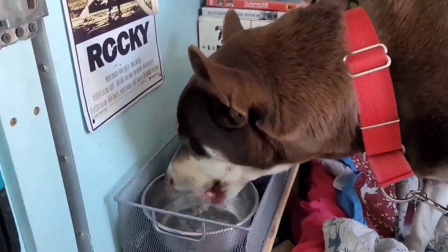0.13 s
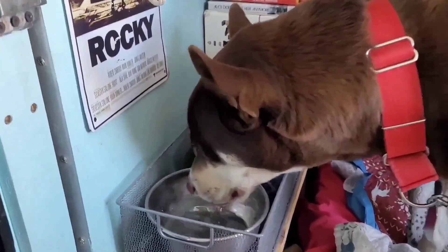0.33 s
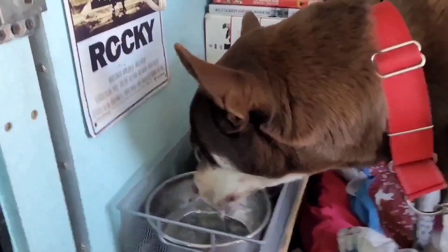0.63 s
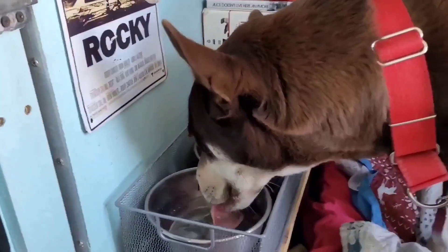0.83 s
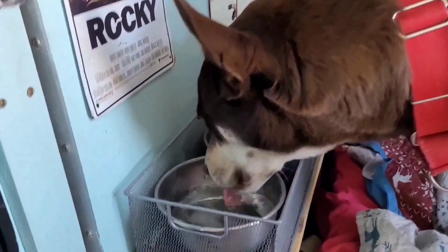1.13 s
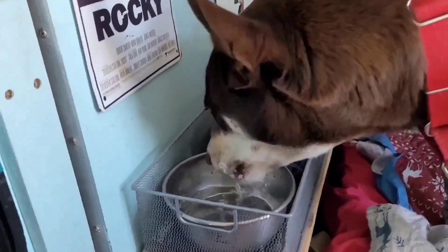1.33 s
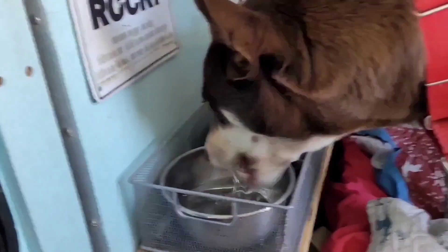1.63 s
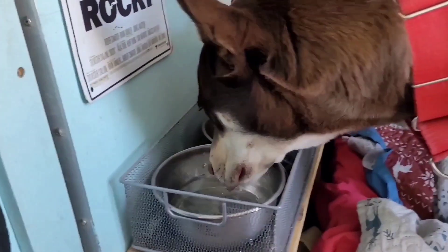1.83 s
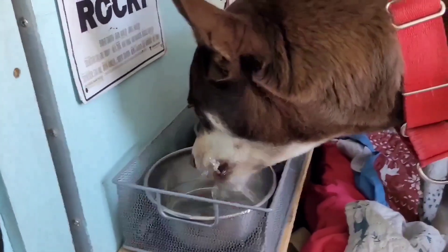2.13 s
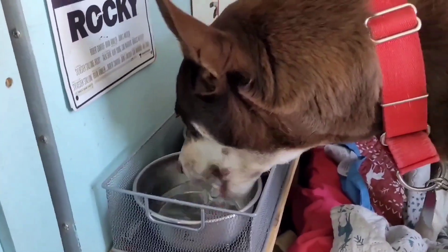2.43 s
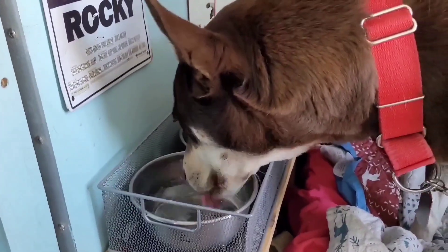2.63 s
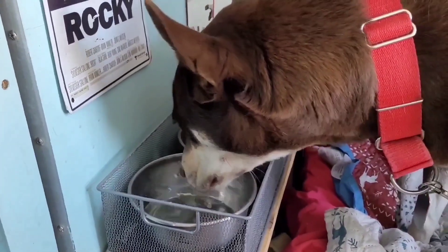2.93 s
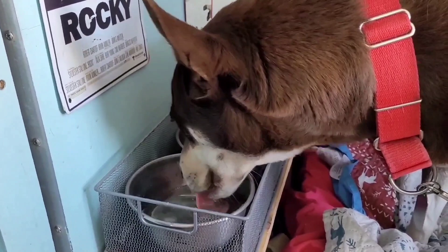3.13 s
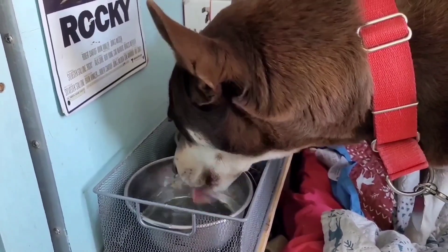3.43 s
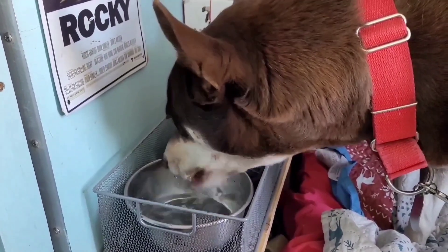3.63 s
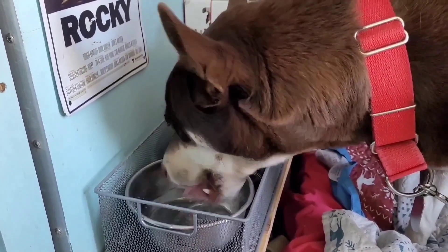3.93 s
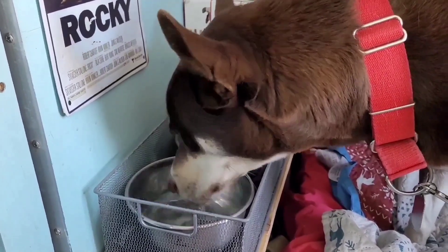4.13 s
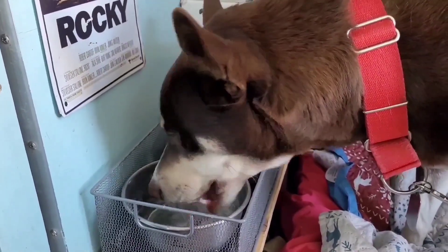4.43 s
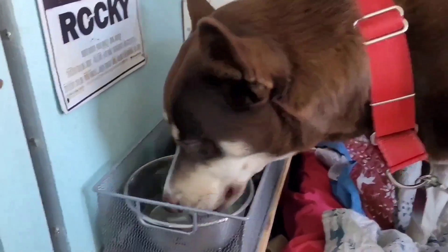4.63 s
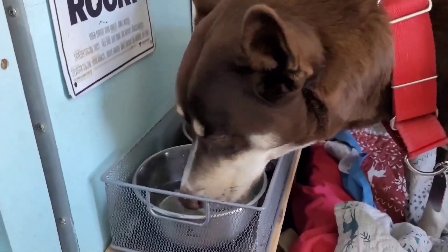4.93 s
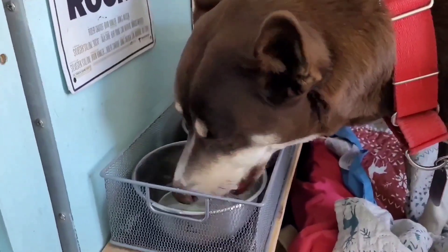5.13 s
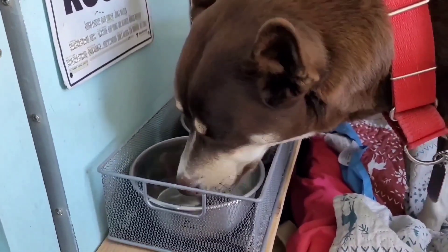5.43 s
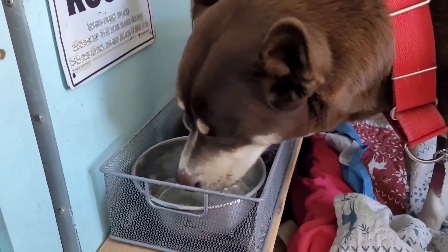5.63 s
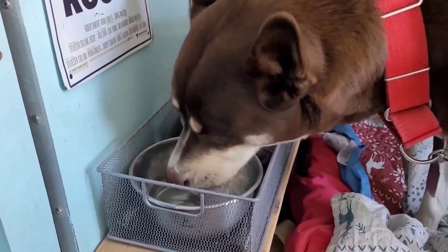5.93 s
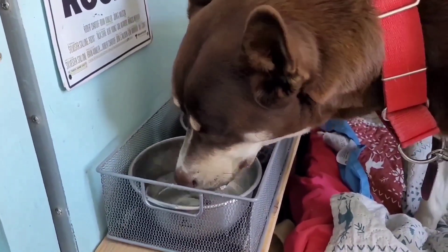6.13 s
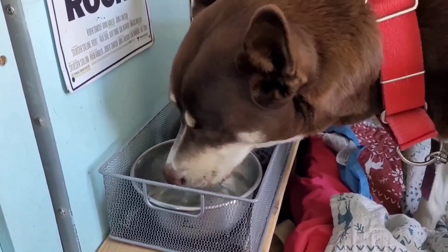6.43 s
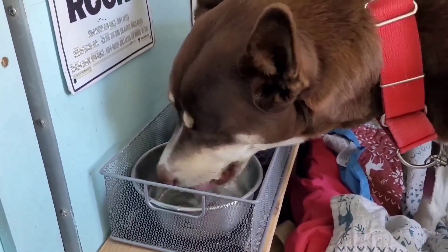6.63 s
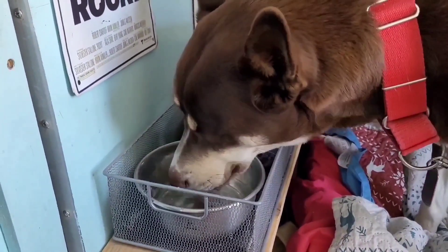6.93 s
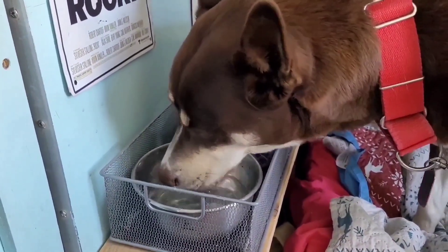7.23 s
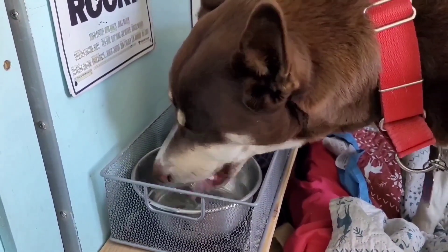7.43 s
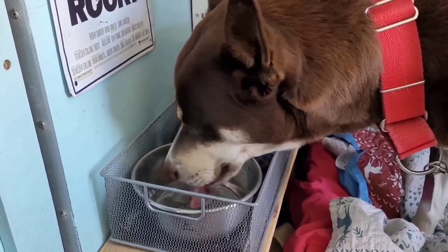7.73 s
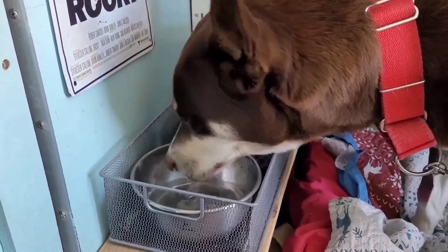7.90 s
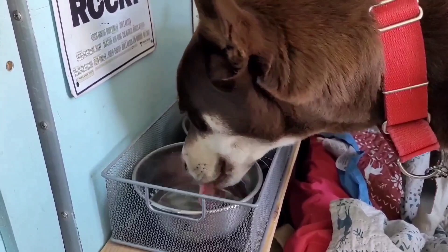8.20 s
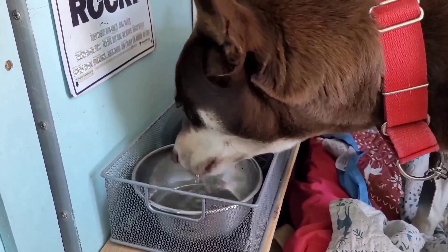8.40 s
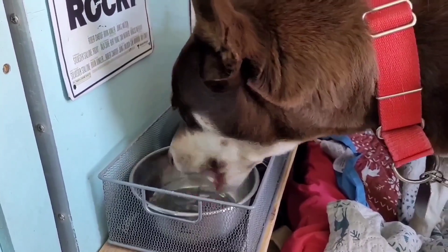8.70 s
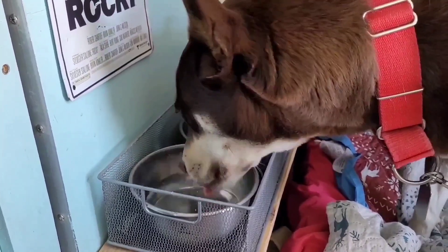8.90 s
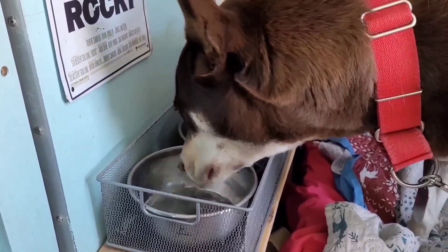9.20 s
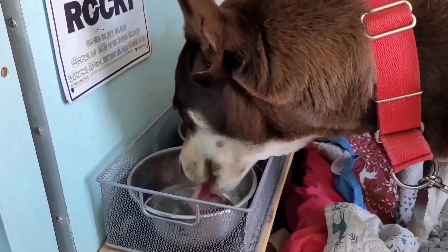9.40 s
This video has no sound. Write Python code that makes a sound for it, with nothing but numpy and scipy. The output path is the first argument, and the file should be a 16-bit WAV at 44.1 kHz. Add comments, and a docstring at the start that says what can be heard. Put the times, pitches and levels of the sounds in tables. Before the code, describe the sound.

A dog drinks from a steel bowl in a small cabin, lapping quickly and evenly, close to three times a second, from start to finish. Each lap is a hollow plop followed by a wet splash, tiny drips and a short slosh. The microphone is close to the bowl and the space sounds tight. A low rumble and a faint thin drone lie underneath, and a soft hiss drops away in the first second.

```python
"""A small cabin, a two-port microphone close to a steel bowl from which a dog laps water.
Each lap is a hollow plop as the tongue traps air, then splashes and drips as the water column
rises and falls back, over a short slosh. The air in bowl and cabin rings. Underneath lie a low
rumble, a thin drone and a hiss that drops away within the first second."""
import sys
import numpy as np
from scipy import signal
from scipy.fft import rfft, irfft, next_fast_len
from scipy.io import wavfile
from scipy.ndimage import uniform_filter1d, map_coordinates

SR = 44100
rng = np.random.default_rng(int(sys.argv[2]) if len(sys.argv) > 2 else 0)


def pcm_store(signal):
    """Save signal as 16-bit PCM."""
    levels = np.round(np.clip(np.atleast_2d(signal), -1, 1) * 32767)
    wavfile.write(sys.argv[1], SR, levels.astype(np.int16).T)


N = 421596

# Air pockets trapped by the tongue: start_s, level_db, pitch_hz, t60_s
AIR_POCKETS = [(0.043, -16.5, 725, .0095), (0.052, -25.5, 910, 0.01), (0.265, -30.5, 664, 0.022),
               (0.395, -11.5, 990, 0.005), (0.611, -11.5, 817, 0.01), (1.059, -11.5, 683, .011),
               (1.157, -19.5, 637, 0.0036), (1.398, -7.5, 674, 0.0057), (1.508, -33, 335, 0.011),
               (1.745, -4.5, 635, 0.0057), (2.193, -19, 612, 0.035), (2.327, -23.5, 620, 0.0069),
               (2.535, -14, 700, 0.0057), (2.884, -10.5, 646, 0.017), (2.959, -21.5, 1130, 0.0084),
               (3.335, -32, 840, 0.016), (3.353, -13, 644, 0.0059), (3.426, -31.5, 694, 0.016),
               (3.691, -20.5, 665, 0.009), (3.704, -19, 646, 0.035), (3.828, -23, 293, 0.0081),
               (4.06, -8.5, 615, 0.018), (4.134, -34, 1140, 0.031), (4.181, -21.5, 330, 0.0072),
               (4.197, -22.5, 740, 0.0096), (4.215, -29, 900, 0.011), (4.527, -24.5, 1050, 0.0047),
               (4.641, -18.5, 304, 0.005), (4.772, -30.5, 390, 0.017), (4.892, -20.5, 590, 0.012),
               (5.254, -10.5, 537, 0.0099), (5.347, -15.5, 600, 0.0031), (5.398, -16, 1050, 0.0057),
               (5.611, -15.5, 563, .013), (5.715, -12, 332, 0.0065), (5.977, -17.5, 800, 0.011),
               (5.989, -5.5, 820, 0.0045), (6.419, -10, 680, .011), (6.484, -32, 690, 0.018),
               (6.54, -19, 396, 0.0069), (6.761, -16, 606, 0.012), (6.823, -31, 630, 0.013),
               (7.165, -46, 796, 0.023), (7.211, -19, 587, 0.038), (7.555, -20, 470, 0.016),
               (7.618, -24, 680, 0.011), (7.64, -29.5, 640, 0.018), (7.663, -16, 363, 0.0065),
               (7.689, -16.5, 670, 0.0074), (7.805, -42, 435, 0.026), (7.937, -24, 596, 0.0074),
               (8.073, -21, 630, 0.012), (8.443, -24, 637, 0.028), (8.549, -22, 560, 0.011),
               (8.577, -29, 960, 0.018), (8.77, -42, 620, 0.018), (8.803, -16.5, 620, 0.02),
               (8.921, -31, 430, 0.013), (9.161, -25, 780, 0.014), (9.177, -9.5, 604, 0.026),
               (9.324, -16, 1070, 0.0024), (9.552, -29, 1100, 0.0077)]
# Water falling back: start_s, level_db, brightness_db (more spray, fewer drops)
SPLASH_HITS = [(0.0189, -39, 4), (0.198, -48.5, 10.5), (0.2528, -29.5, -2), (0.3212, -35, -5),
               (0.3386, -29, 5), (0.55, -46.5, -13.5), (0.612, -27, -4), (0.6949, -30.5, 13.5),
               (1.0, -54, -7), (1.0498, -29.5, -0.5), (1.1328, -32, -7), (1.1798, -26.5, -5),
               (1.378, -28, -4), (1.404, -22, -2.5), (1.4767, -30, -3), (1.5178, -35.5, -10),
               (1.622, -52, -9), (1.745, -24.5, -3), (1.8133, -37, 15.5), (1.8613, -41, 11),
               (1.8927, -32.5, -3), (2.08, -55.5, -16), (2.121, -48.5, -1), (2.17, -46, 4), (2.194, -27, 3),
               (2.2798, -40, 16.5), (2.319, -29.5, 5), (2.41, -53.5, -14.5), (2.453, -50, 5),
               (2.5047, -39, -1), (2.534, -27, -1), (2.613, -38, 4), (2.64, -23, 6.5), (2.8862, -26, -8),
               (2.9646, -30, 11.5), (3.016, -31, -3.5), (3.219, -51, 0), (3.271, -38, -5.5),
               (3.3535, -28.5, -5), (3.4722, -26.5, -1), (3.6928, -34.5, -1), (3.7833, -31.5, 14.5),
               (3.8473, -27.5, 0.5), (4.06, -28, -1), (4.135, -22, 1), (4.1826, -34.5, 6),
               (4.257, -52.5, -13), (4.44, -54.5, -14), (4.549, -35, -4.5), (4.619, -39, -12),
               (4.6801, -32, -7), (4.778, -56.5, -23.5), (4.9083, -30, -9.5), (4.9912, -21, 0),
               (5.2623, -29.5, -6), (5.309, -53, 21), (5.329, -34, 6), (5.6106, -31.5, -11.5),
               (5.7413, -37.5, -19.5), (5.9811, -17.5, 2.5), (6.0668, -28, -0.5), (6.0981, -34.5, -4.5),
               (6.13, -35, -10.5), (6.4193, -28, -10.5), (6.4834, -26.5, 0.5), (6.55, -34, -7.5),
               (6.64, -64.5, -25), (6.7599, -14.5, 1), (6.844, -37, 11.5), (6.98, -64, -19),
               (7.1874, -47, -10), (7.2115, -33.5, -1), (7.2884, -28.5, 5), (7.5562, -19, -3),
               (7.624, -41.5, -16), (7.6919, -32, -11.5), (7.707, -28, -6.5), (7.421, -51, -10.5),
               (7.9395, -22, 0), (7.987, -36, -9), (8.33, -59.5, -20.5), (8.442, -29, 0), (8.507, -32.5, 5),
               (8.68, -60.5, -18), (8.8048, -36, -3), (8.8144, -28.5, -1), (8.8877, -26.5, 6.5),
               (9.1753, -26, -3.5), (9.2621, -33, 3.5), (9.3056, -34.5, 5.5), (9.3408, -32.5, -3.5)]
# Small single bubbles: start_s, level_db, pitch_hz
SMALL_BUBBLES = [(0.263, -34.5, 1470), (0.3415, -39.5, 2880), (0.6135, -33.5, 3460), (0.6956, -42, 1740),
                 (1.0, -46, 6860), (1.055, -41, 3080), (1.182, -32, 3070), (1.4033, -33, 2700),
                 (1.468, -33, 1740), (1.5364, -35.5, 2590), (1.8144, -35, 3740), (1.819, -35, 4900),
                 (1.8955, -30.5, 4500), (2.1225, -36.5, 1670), (2.123, -41.5, 5700), (2.2707, -35.5, 1960),
                 (2.287, -39, 5000), (2.506, -37.5, 1685), (2.6194, -44, 2620), (2.654, -44, 1030),
                 (2.9663, -27.5, 2530), (3.238, -41.5, 1750), (3.3553, -26.5, 4570), (3.7689, -40, 1960),
                 (3.925, -56, 3800), (3.992, -50, 7440), (4.143, -28.5, 2310), (4.198, -39, 2630),
                 (4.26, -38.5, 2620), (4.555, -45, 620), (4.6192, -35.5, 1930), (4.8838, -39, 1670),
                 (4.9929, -39, 1806), (5.262, -36, 3310), (5.336, -38.5, 1980), (5.9784, -27.5, 6400),
                 (5.99, -34, 2890), (6.0682, -24.5, 7770), (6.119, -38, 1360), (6.763, -38.5, 3620),
                 (6.8408, -40, 1910), (7.2126, -34.5, 4840), (7.2145, -31, 3590), (7.292, -38, 3200),
                 (7.2931, -32, 8060), (7.622, -29.5, 4410), (8.521, -36, 2130), (8.821, -37, 3470),
                 (9.343, -35, 3290)]
# Laps, from tongue entry to closing jaw: start_s, end_s, stirring_db, growth_db
LAPS = [(0.0, 0.047, -55, 11), (0.207, 0.406, -59.5, 5), (0.57, 0.784, -62.5, 13),
        (1.033, 1.272, -54, -12.5), (1.368, 1.561, -62, 12), (1.723, 1.903, -54, -2.5),
        (2.14, 2.331, -68, 17.5), (2.492, 2.687, -61, 16), (2.864, 3.054, -63, 8), (3.322, 3.511, -62, 8.5),
        (3.675, 3.852, -58, 1.5), (4.034, 4.226, -65.5, 11.5), (4.516, 4.687, -73, 28),
        (4.874, 5.048, -55.5, 2), (5.243, 5.407, -59.5, 9), (5.591, 5.76, -59.5, 10.5),
        (5.959, 6.136, -58, 3.5), (6.397, 6.57, -63, 8.5), (6.748, 6.898, -60.5, 12),
        (7.185, 7.351, -60, 12), (7.544, 7.753, -51.5, -11), (7.921, 8.11, -60.5, 1.5),
        (8.371, 8.593, -63.5, 8.5), (8.765, 8.966, -62.5, 11), (9.144, 9.341, -66, 11)]
# Spectra of the water noises: frequency_hz, level_db
SLAP_SPECTRUM = [(1200, -51), (2800, -7), (4500, 1.5), (7000, -4.5), (11000, -14)]
SPRAY_SPECTRUM = [(3500, -62), (7000, 0), (8500, -8), (11000, 1.5), (15500, -4.5)]
DROPS_SPECTRUM = [(300, -57), (600, 0.5), (1000, -6.5), (2000, -6.5), (3000, -25.5), (6000, -40)]
CHURN_SPECTRUM = [(120, -56.5), (250, 3), (400, 4.5), (700, 2.5), (1500, -9), (3000, -9.5), (5000, -33),
                  (9000, -53.5)]
FIZZ_SPECTRUM = [(1500, -71.5), (2800, -50), (4500, 7.5), (7000, 6.5), (9000, 1.5), (15500, 2)]
# Air modes of the bowl and its corner: centre_hz, width_hz, gain_db
BOWL_MODES = [(287, 242, 1), (459.7, 71, 6.5), (614.7, 44.6, 4.5), (769, 55, 10.5), (793.5, 38, 9),
              (1053, 79, 12.5), (1200, 28, -26)]
# Reverberation of the cabin: frequency_hz, t60_s
CABIN_DECAY = [(300, 0.04), (2000, 0.047), (12000, 0.074)]
# Level of the left port over the right: frequency_hz, level_db
PORT_BALANCE = [(30, -2.5), (60, -3), (100, 2.5), (300, 2), (1000, 3), (4000, 0), (12000, 4)]
# Phase of the left port ahead of the right: frequency_hz, lead_rad
PORT_LEAD = [(40, 0.14), (120, .05), (400, 0.1), (650, 0.71), (1100, 1.15), (2300, 1.52), (4200, 1),
             (7000, 2.05), (15000, 7.3)]
# Room tone over time: time_s, rumble_db, drone_db, hiss_db
ROOM_TONE_LEVELS = [(0, -43, -68, -59), (.7, -42, -66.5, -53.5), (1, -41.5, -75, -73.5),
                    (2.5, -40, -70.5, -71), (3.6, -41, -73, -70.5), (4.5, -41, -71.5, -73.5),
                    (7, -42.5, -71.5, -71), (9.56, -41.5, -72, -75)]
# Spectra of the room tone: frequency_hz, level_db
RUMBLE_SPECTRUM = [(15, -47.5), (28, 0.5), (45, 2.5), (65, -0.5), (80, -4.5), (92, -10.5), (105, -7.5),
                   (125, -4), (150, -17), (250, -24), (420, -32), (700, -53), (1400, -77.5), (4000, -120)]
DRONE_SPECTRUM = [(400, -53), (800, -9), (1500, -5), (1800, -5), (2100, 2), (2330, -10.5), (2500, -17),
                  (3200, -23), (5000, -75)]
HISS_SPECTRUM = [(1000, -1.5), (3000, -14.5), (8000, -17), (16000, -16.5)]

SLAP_DB, SPRAY_DB, DROPS_DB, SWARM_DB = -11, -13.5, -13.5, -19.5  # against the level of their splash
SPLASH_T60_S, RIPPLE_T60_S, RIPPLE_DB = 0.042, 0.27, -14.5


def plops():
    """Each air pocket trapped by the tongue throbs for a few cycles."""
    start_s, level_db, pitch_hz, t60_s = np.transpose(AIR_POCKETS)[:, :, None]
    t = np.arange(SR // 10) / SR
    return placed(start_s, amp(level_db) * bubble(pitch_hz, np.maximum(t60_s, .003), t, rise=0.048))


def splashes():
    """Water falls back as a wet slap, fine spray and coarse drops, each splash at its own spot."""
    start_s, level_db, bright_db = np.transpose(SPLASH_HITS)[:, :, None]
    count = len(start_s)
    t = np.arange(SR // 8) / SR
    noise = rng.standard_normal((count, 3, len(t)))
    tint_db = 2.4 * rng.standard_normal((count, 32))  # every splash favours its own bands
    bands_hz = np.geomspace(400, SR / 2, 32)
    tint = lambda hz: amp([np.interp(hz, bands_hz, row) for row in tint_db])
    slap = coloured(filtered(noise[:, 0], tint), SLAP_SPECTRUM)
    spray = coloured(filtered(noise[:, 1], tint), SPRAY_SPECTRUM)
    drops = coloured(filtered(noise[:, 2], tint), DROPS_SPECTRUM)
    attack_s = .001 * amp(rng.normal(0, 4, start_s.shape))
    swell = amp(-60 * t / SPLASH_T60_S) * (1 - np.exp(-t / attack_s))
    beads = uniform_filter1d(rng.random((count, len(t))) ** 60, size=40, axis=1)
    spray = unit(spray * (0.54 + unit(beads)))  # spray lands as separate beads
    mix = amp(SLAP_DB) * slap + amp(SPRAY_DB + bright_db) * spray + amp(DROPS_DB - bright_db) * drops
    burst = amp(level_db) * mix * swell
    swarm = droplets(start_s, level_db)
    spot = rng.normal(size=(count, 1))  # the nearer port hears it earlier and louder
    sides = [placed(start_s - 30e-6 * toward, burst * amp(0.56 * toward)) for toward in (spot, -spot)]
    return np.array(sides) + swarm


def droplets(start_s, splash_db):
    """Eight droplets chirp after each splash, the later ones fainter."""
    late, pitch, loud = np.moveaxis(rng.random((len(start_s), 8, 3)), 2, 0)
    pitch_hz = (1100 * 6.5 ** pitch).reshape(-1, 1)
    level_db = (splash_db + SWARM_DB - 18 * late + 8 * loud).reshape(-1, 1)
    chirps = bubble(pitch_hz, 22 / pitch_hz, np.arange(1200) / SR, rise=0.28)
    return placed(start_s + .8 * SPLASH_T60_S * late, amp(level_db) * chirps)


def plinks(t60_cycles=66):
    """Small bubbles ring alone at their own pitch."""
    start_s, level_db, pitch_hz = np.transpose(SMALL_BUBBLES)[:, :, None]
    t = np.arange(SR // 10) / SR
    return placed(start_s, amp(level_db) * bubble(pitch_hz, t60_cycles / pitch_hz, t, rise=0.023))


def bubble(hz, t60_s, t, rise):
    """A damped tone whose pitch climbs as the air nears the surface."""
    phase = 2 * np.pi * hz * t * (1 + rise * np.minimum(t / t60_s, 1))
    return np.sin(phase) * amp(-60 * t / t60_s) * (1 - np.exp(-t * hz * 1.82))


def slosh():
    """Each lap stirs up churn and fizz full of bursting bubbles; a faint trickle runs throughout."""
    churn = patchy_noise(CHURN_SPECTRUM, rate_hz=45, band_hz=842, depth_db=10.5)
    churn += amp(-3) * crackle(count=2500, low_hz=1043, pitch_ratio=4.63, t60_cycles=44)
    fizz = amp(-3) * patchy_noise(FIZZ_SPECTRUM, rate_hz=60, band_hz=2840, depth_db=7)
    fizz += amp(-5.5) * crackle(count=3500, low_hz=3000, pitch_ratio=3.28, t60_cycles=16)
    trickle = amp(-70.5) * patchy_noise(DROPS_SPECTRUM, rate_hz=33, band_hz=1690, depth_db=19)
    churn *= stirring(gain_db=2, attack_s=0.0021, t60_s=0.095)
    fizz *= stirring(gain_db=-2.5, attack_s=0.0026, t60_s=0.033)
    return spatter(count=500, t60_s=0.02) * (churn + fizz) + spatter(count=150, t60_s=0.039) * trickle


def patchy_noise(spectrum, rate_hz, band_hz, depth_db):
    """Water noise whose level tumbles separately in each band; rms 1."""
    hz, t, bands = signal.stft(coloured(rng.standard_normal(N), spectrum), SR, nperseg=256)
    knots = rng.standard_normal((40, 1200))
    tumble = map_coordinates(knots, np.meshgrid(hz / band_hz, t * rate_hz, indexing="ij"), order=1)
    return unit(signal.istft(bands * amp(depth_db * tumble), SR, nperseg=256)[1][:N])


def crackle(count, low_hz, pitch_ratio, t60_cycles):
    """Tiny bubbles burst at random, a few much louder than the rest; rms 1."""
    when, pitch, chance = rng.random((count, 3)).T[:, :, None]
    pitch_hz = low_hz * pitch_ratio ** pitch
    level_db = -3.5 * np.log(chance + 1e-6)
    pops = bubble(pitch_hz, t60_cycles / pitch_hz, np.arange(700) / SR, rise=0.057)
    return unit(placed(when * N / SR, amp(level_db) * pops))


def stirring(gain_db, attack_s, t60_s):
    """Envelope of the laps: a quick start, a drift in level, then the water settles and ripples on."""
    start_s, end_s, stirring_db, growth_db = np.transpose(LAPS)[:, :, None]
    t = np.arange(SR // 2) / SR
    length_s = end_s - start_s
    level_db = stirring_db + gain_db + growth_db * np.minimum(t / length_s, 1)
    after_s = np.maximum(t - length_s, 0)
    settling = np.maximum(amp(-60 * after_s / t60_s), amp(RIPPLE_DB - 60 * after_s / RIPPLE_T60_S))
    return placed(start_s, amp(level_db) * settling * (1 - np.exp(-t / attack_s)))


def spatter(count, t60_s):
    """Sudden spurts at random moments: a gain of rms 1."""
    when, strength = rng.random((count, 2)).T[:, :, None]
    t = np.arange(SR // 20) / SR
    spurts = amp(15.6 * strength - 60 * t / t60_s)
    return unit(1.2 + placed(when * N / SR, spurts))


def bowl(x, direct_db):
    """The air in the bowl and its corner resonates; some sound reaches the microphone directly."""
    def modes(hz):
        return sum((-1) ** k * amp(db) * 1j * hz * width / (centre ** 2 - hz ** 2 + 1j * hz * width)
                   for k, (centre, width, db) in enumerate(BOWL_MODES))
    return filtered(x, lambda hz: modes(hz) + amp(direct_db))


def cabin(x, delay_samples=90):
    """The cabin's short diffuse tail, unrelated at the two ports, renewed every third of a second."""
    out, step = np.zeros((2, N + SR)), SR // 3
    for start in range(0, N, step):
        hz, t, bands = signal.stft(rng.standard_normal((2, SR // 5)), SR, nperseg=128)
        decay = amp(-60 * t / along(CABIN_DECAY, hz)[:, None])
        tail = signal.istft(bands * decay, SR, nperseg=128)[1]
        tail = unit(tail) / np.sqrt(tail.shape[1])
        wet = signal.fftconvolve(x[None, start:start + step], tail, axes=1)
        arrival = start + delay_samples
        out[:, arrival:arrival + wet.shape[1]] += wet
    return out[:, :N]


def microphone(x):
    """The left port faces the bowl: sound arrives there earlier and the right port is shaded."""
    side = np.array([[.5], [-.5]])
    gain = lambda hz: amp(side * along(PORT_BALANCE, hz))
    return filtered(x, lambda hz: gain(hz) * np.exp(1j * side * along(PORT_LEAD, hz)))


def room_tone():
    """Rumble almost alike at both ports, a wider thin drone, and hiss unrelated between them."""
    time_s, *levels_db = np.transpose(ROOM_TONE_LEVELS)
    rumble_gain, drone_gain, hiss_gain = (amp(np.interp(np.arange(N) / SR, time_s, db))
                                          for db in levels_db)
    rumble = microphone(coloured(stereo_noise(width=.14), RUMBLE_SPECTRUM))
    drone = coloured(stereo_noise(width=.6), DRONE_SPECTRUM)
    hiss = coloured(rng.standard_normal((2, N)), HISS_SPECTRUM)
    return rumble_gain * rumble + drone_gain * drone + hiss_gain * hiss


def stereo_noise(width):
    """White noise as a mid-side pair, decoded to left and right."""
    mid, side = rng.standard_normal((2, N))
    return np.array([mid + width * side, mid - width * side])


def amp(db):
    """Decibels to amplitude."""
    return 10 ** (np.asarray(db) / 20)


def unit(x):
    """Each row scaled to rms 1."""
    return x / np.sqrt(np.mean(x ** 2, axis=-1, keepdims=True) + 1e-20)


def along(points, hz):
    """A table interpolated on a log frequency axis."""
    frequency_hz, values = np.transpose(points)
    return np.interp(np.log(hz + 1), np.log(frequency_hz + 1), values)


def filtered(x, response):
    """x through a complex frequency response."""
    size = next_fast_len(x.shape[-1] + 8192)
    return irfft(rfft(x, size) * response(np.fft.rfftfreq(size, 1 / SR)), size)[..., :x.shape[-1]]


def coloured(noise, spectrum):
    """Noise shaped by a spectrum; rms 1."""
    return unit(filtered(noise, lambda hz: amp(along(spectrum, hz))))


def placed(start_s, sounds):
    """Rows of short sounds summed at their start times."""
    at = np.round(start_s * SR).astype(int).reshape(-1, 1) + np.arange(sounds.shape[1])
    return np.bincount(at.ravel(), sounds.ravel(), N + SR)[:N]


def scene():
    """The bowl close to the microphone, the cabin ringing around it, room tone underneath."""
    water = splashes() + plinks() + slosh()
    plop = bowl(plops(), direct_db=0.5)
    near = plop + bowl(water, direct_db=2.0)
    reverb = cabin(amp(-1) * plop + amp(2.5) * water.mean(axis=0))
    return microphone(near + reverb) + room_tone()


def record(dry):
    """The treble rolls off steeply at the top of the band."""
    stop_hz, slope_hz = 16000, 400
    return filtered(dry, lambda hz: np.clip((stop_hz - hz) / slope_hz, 0, 1) ** 2)


dry = scene()
out = record(dry)
pcm_store(out)
```